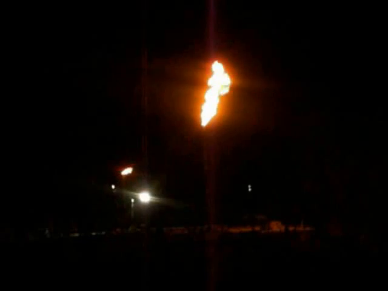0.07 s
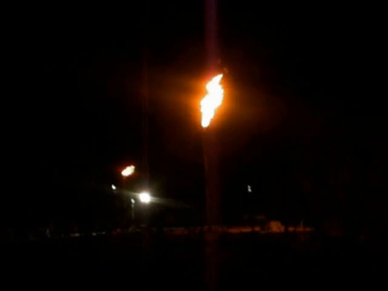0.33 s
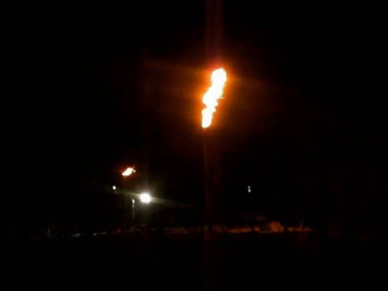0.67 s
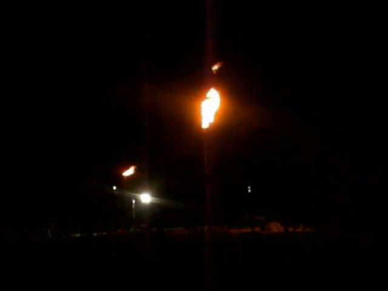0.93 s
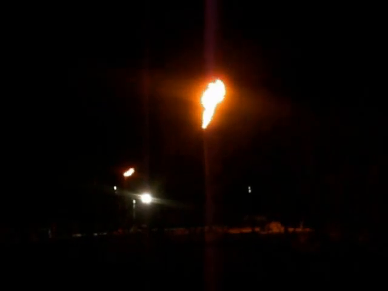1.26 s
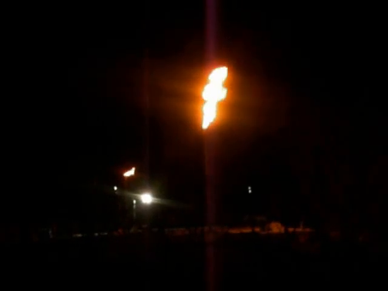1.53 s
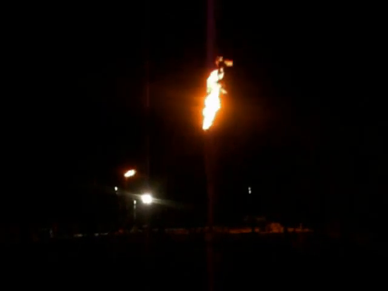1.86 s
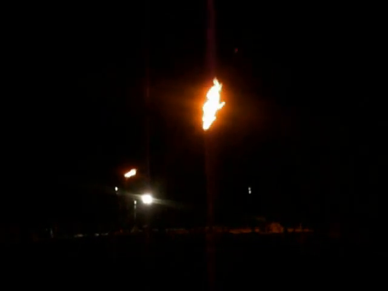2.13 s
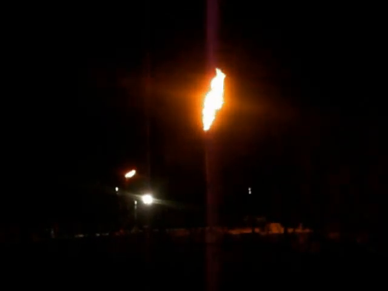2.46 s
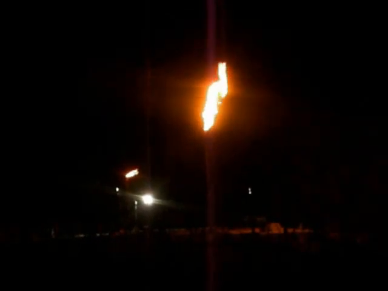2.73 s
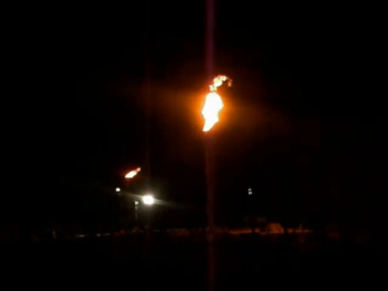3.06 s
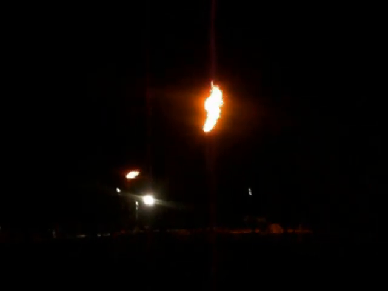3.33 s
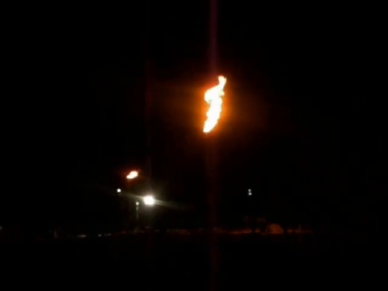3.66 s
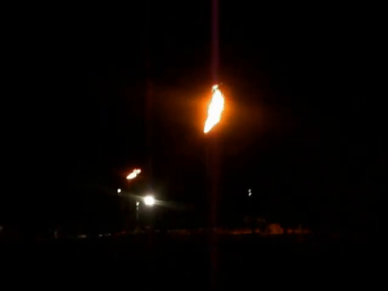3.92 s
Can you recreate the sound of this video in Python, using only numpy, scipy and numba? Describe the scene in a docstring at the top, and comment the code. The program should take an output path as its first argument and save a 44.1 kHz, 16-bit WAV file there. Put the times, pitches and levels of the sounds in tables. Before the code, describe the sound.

After an opening pop and a gritty moment, the low rushing roar of a gas flare holds steady, heard from far off in the open air. Plant engines throb and hum, and the hissing jet whistles faintly a few times.

```python
"""A gas flare at night, far off. First the recorder wakes with a pop: its input offset jumps, holds, settles.
Meanwhile the sound fades in, gritty at first: the flame's low turbulent roar, the gas jet's hiss above it,
two plant engines throbbing against each other at nearly equal speed, and the hum of other machines.
From about 0.7 s, brief breathy whistles rise out of the jet. The flame is strongest near 2.5 s."""
import sys
import numpy as np
from scipy import signal
from scipy.fft import rfft, irfft
from scipy.io import wavfile
from numba import njit

SR = 44100
rng = np.random.default_rng(int(sys.argv[2]) if len(sys.argv) > 2 else 0)


def to_wav(s):
    """Save 16-bit WAV."""
    ch = np.atleast_2d(s).T  # columns
    pcm = np.round(np.clip(ch, -1, 1) * 32767)  # PCM
    wavfile.write(sys.argv[1], SR, pcm.astype(np.int16))


N = 176400
TIME_S = np.arange(N) / SR

# Input fade-in. Each row: time in seconds, gain in dB.
FADE_IN_DB = [(.04, -12), (.12, -8), (.17, -4), (.22, 0)]
# Grit. Each row: time in seconds, gain of the stepping error in dB.
GRIT_DB = [(.04, 2), (.13, 4.5), (.19, 4), (.26, 5), (.33, -1.5), (.45, -12), (.8, -23)]
# Flame roar. Each row: frequency in Hz, density in dB per Hz.
ROAR_SPECTRUM = [(18, -54.5), (35, -57.5), (65, -60.5), (110, -68), (160, -72.5), (215, -66), (300, -65.5),
                 (410, -63.5), (500, -68.5), (600, -67), (715, -72.5), (785, -66), (880, -73),
                 (1030, -71.5), (1300, -78.5), (1600, -85.5), (3000, -102)]
# Flame strength. Each row: time in seconds, strength in dB before per-band scaling.
FLAME_STRENGTH_DB = [(.2, 0), (.55, 0), (.9, 0.2), (1.2, -.3), (1.6, 0.5), (1.98, 0.3), (2.1, 0.4),
                     (2.48, 1.8), (2.58, -1), (3.1, -0.8), (3.6, -1.55), (4, -1.0)]
# Jet hiss. Each row: frequency in Hz, density in dB per Hz.
HISS_SPECTRUM = [(700, -100), (1500, -87), (1900, -83), (2200, -82), (2450, -84), (2750, -84.5),
                 (3100, -86), (3800, -88), (4700, -89.5), (5200, -92), (5500, -99)]
# Jet strength. Each row: time in seconds, strength in dB before per-band scaling.
JET_STRENGTH_DB = [(.25, 1.5), (.55, -1), (.82, 1), (1.0, -2), (1.35, 1), (1.6, -0.5), (1.95, 0.5),
                   (2.2, 1.5), (2.4, 0.7), (2.55, 0.1), (2.74, 0.5), (2.9, 0), (3.5, -0.5), (4, 0)]
# Jet resonances. Each row: centre in Hz, width in Hz, level in dB, dB per dB of jet strength.
JET_RESONANCES = [(2660, 400, -65, 2.5), (4224, 220, -63, 1.4)]
# Engine partials. Each row: multiple of the cycle rate, first engine's level in dB,
# second engine's level in dB, time of one beat crest in seconds.
ENGINE_PARTIALS = [(3, -35.5, -44, 2.1), (6, -45.5, -43.5, 2.23), (9, -43.5, -44.5, 2.04),
                   (10, -70, -58.5, 2.1), (12, -46, -62.5, 2.1), (13, -43, -58, 2.1),
                   (15, -61.5, -55.5, 2.1), (16, -67.5, -60.5, 2.1)]
# Swell of the deepest engine partial. Each row: time in seconds, gain in dB.
THROB_DB = [(.2, 3), (.6, 3), (.95, -2.5), (1.3, -7), (1.75, 4), (2.1, -2), (2.45, 0.5), (2.75, -1),
            (3.3, 0.5), (3.6, 3.5), (4, -1.5)]
# Other machines. Each row: frequency in Hz, level in dB, level spread in dB.
MACHINE_HUMS = [(48.77, -52, 1.5), (60.0, -44, 1.5), (62.0, -45, 1), (74.96, -47.5, 0.5), (98.54, -56, 1),
                (119.5, -56.5, 1), (203, -57, 0), (285.8, -44, 0.43), (403, -58, 0), (812.6, -58.5, 2.5),
                (1322, -67, 1.5), (1793, -71, 5), (4240, -70.5, 1.5)]
# Jet whistles. Each row: peak time in seconds, length in seconds, pitch in Hz, level in dB.
JET_WHISTLES = [(0.731, 0.13, 2240, -57.5), (.84, .16, 2170, -54.5), (2.118, .14, 2157, -54),
                (2.235, .14, 2196, -53), (2.374, 0.14, 2175, -55), (2.722, .14, 2280, -59)]


def from_db(db):
    """Decibels to gain."""
    return 10 ** (np.asarray(db) / 20)


def curve(rows):
    """Time-value rows, interpolated to every sample."""
    return np.interp(TIME_S, *np.transpose(rows))


def wake_pop(wake_s, offset=-.32, hold_s=.2, decay_s=.085):
    """Switching on adds an input offset that jumps, holds, then decays."""
    settling_s = np.maximum(TIME_S - wake_s - hold_s, 0)
    return offset * np.exp(-settling_s / decay_s) * (TIME_S >= wake_s)


@njit
def grit(x, step, slack_steps):
    """Error of an input that moves in whole steps, and only once past the slack."""
    stepped, held = np.zeros_like(x), 0.0
    for i in range(len(x)):
        if abs(x[i] - held) > slack_steps * step:
            held = step * np.floor(x[i] / step + .5)
        stepped[i] = held
    return stepped - x


def drift(rate_hz):
    """Smooth random wander, spread 1."""
    hop, warmup = 100, 2000
    pole = np.exp(-2 * np.pi * hop * rate_hz / SR)
    noise = rng.standard_normal(N // hop + warmup + 2)
    slow = signal.lfilter([1], [1, -2 * pole, pole * pole], noise)[warmup:]
    return np.interp(np.arange(N) / hop, np.arange(len(slow)), slow / slow.std())


def noise_bands(spectrum, count=14):
    """Coloured noise in overlapping bands; yields centre in Hz and band."""
    log_hz = np.log(np.maximum(np.fft.rfftfreq(N, 1 / SR), 1))
    hz, db = np.transpose(spectrum)
    colour = from_db(np.interp(log_hz, np.log(hz), db))
    bins = rfft(rng.standard_normal(N)) * np.sqrt(SR / 2) * colour
    centres_hz = np.geomspace(40, 5500, count)
    for centre_hz, share in zip(centres_hz, np.eye(count)):
        yield centre_hz, irfft(bins * np.interp(log_hz, np.log(centres_hz), share), N)


def flame(shared_db=.24, band_db=.38, flutter_hz=6, surge_hz=1200, surge_octaves=.56):
    """Turbulent burning: each band flutters; a stronger flame brightens most around surge_hz."""
    strength_db = curve(FLAME_STRENGTH_DB)
    shared_flutter_db = shared_db * drift(flutter_hz)
    out = np.zeros(N)
    for hz, band in noise_bands(ROAR_SPECTRUM):
        db_per_db = .3 + 1.6 * np.exp(-(np.log2(hz / surge_hz) / surge_octaves) ** 2)
        out += band * from_db(db_per_db * strength_db + shared_flutter_db + band_db * drift(flutter_hz))
    return out


def resonance(hz, width_hz):
    """Band-passed noise, rms 1."""
    sos = signal.butter(2, [hz - width_hz / 2, hz + width_hz / 2], "band", fs=SR, output="sos")
    band = signal.sosfilt(sos, rng.standard_normal(N))
    return band / band.std()


def jet(band_db=.42, flutter_hz=8, rasp_db=.8, rasp_hz=120, swell_top_hz=3140):
    """Gas rushes from the tip: a rasping hiss with whistles; its resonances stand out as it swells."""
    strength_db = curve(JET_STRENGTH_DB)
    out = np.zeros(N)
    for hz, band in noise_bands(HISS_SPECTRUM):
        swell_db = strength_db / (1 + (hz / swell_top_hz) ** 4)
        out += band * from_db(swell_db + band_db * drift(flutter_hz))
    for hz, width_hz, db, db_per_db in JET_RESONANCES:
        out += resonance(hz, width_hz) * from_db(db + db_per_db * strength_db)
    return (out + whistles()) * from_db(rasp_db * drift(rasp_hz))


def engines(cycle_rates_hz=(14.815, 14.636)):
    """Two engines' partials beat as one slowly overtakes the other."""
    out = np.zeros(N)
    for row, (order, *levels_db, crest_s) in enumerate(ENGINE_PARTIALS):
        crest_turns = rng.random()
        swell_db = curve(THROB_DB) if row == 0 else 0
        for hz, db in zip(cycle_rates_hz, levels_db):
            turns = order * hz * (TIME_S - crest_s) + crest_turns
            out += from_db(db + swell_db) * np.sin(2 * np.pi * turns)
    return np.sqrt(2) * out  # levels are rms


def machines(waver_hz=3):
    """Steady hums and faint whines, wavering on their way through the air."""
    out = np.zeros(N)
    for hz, db, spread_db in MACHINE_HUMS:
        wander_hz = .4 * np.sqrt(hz / 100)
        turns = rng.random() + np.cumsum(hz + wander_hz * drift(waver_hz)) / SR
        out += from_db(db + spread_db * drift(waver_hz)) * np.sin(2 * np.pi * turns)
    return np.sqrt(2) * out  # levels are rms


def whistles(width_hz=130):
    """Breathy jet whistles: narrow noise in brief bell-shaped swells."""
    out = np.zeros(N)
    for peak_s, length_s, hz, db in JET_WHISTLES:
        swell = np.exp(-(2 * (TIME_S - peak_s) / length_s) ** 2)
        out += resonance(hz, width_hz) * from_db(db) * swell
    return out


def scene():
    """Flare and plant from afar, mono."""
    return (flame() + jet() + engines() + machines())[None]


def record(dry, wake_s=.0363, cutoff_hz=5960, output_cutoff_hz=17500):
    """The input wakes, fades in through coarse steps and is cut at the top; the pop joins after that."""
    faded = dry[0] * from_db(curve(FADE_IN_DB))
    gritty = faded + grit(faded, step=.011, slack_steps=.85) * from_db(curve(GRIT_DB))
    input_lowpass = signal.cheby2(20, 62, cutoff_hz, fs=SR, output="sos")
    dulled = signal.sosfilt(input_lowpass, gritty * (TIME_S >= wake_s))
    output_lowpass = signal.cheby2(12, 70, output_cutoff_hz, fs=SR, output="sos")
    return signal.sosfilt(output_lowpass, dulled + wake_pop(wake_s))[None]


dry = scene()
out = record(dry)
to_wav(out)
```